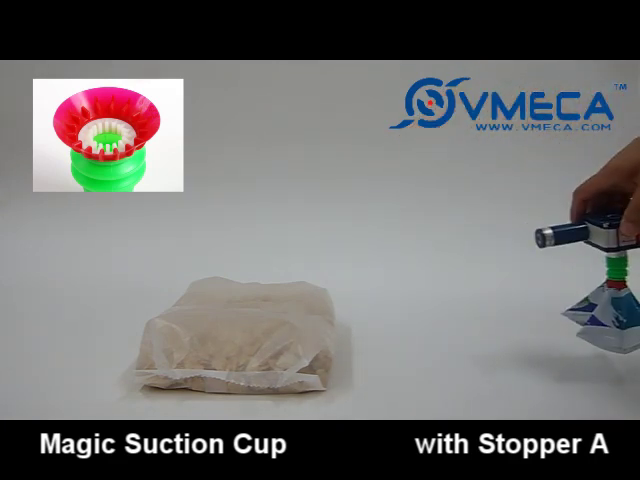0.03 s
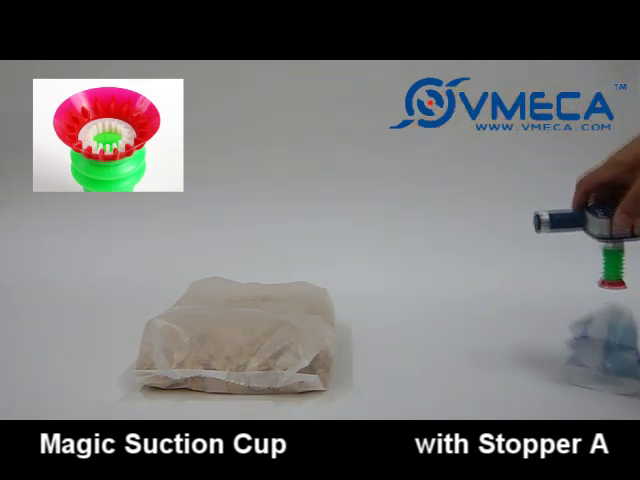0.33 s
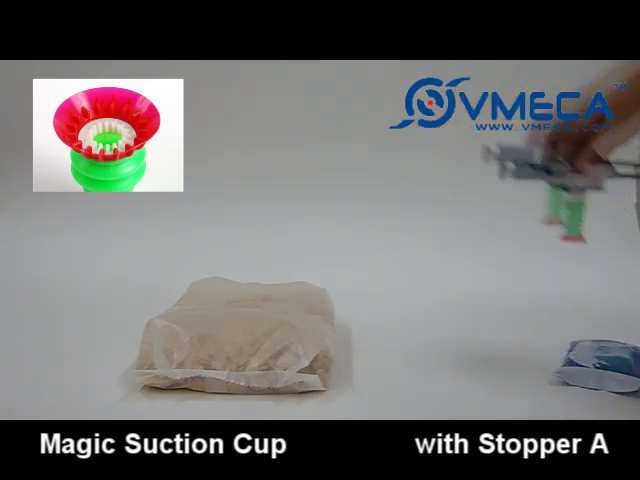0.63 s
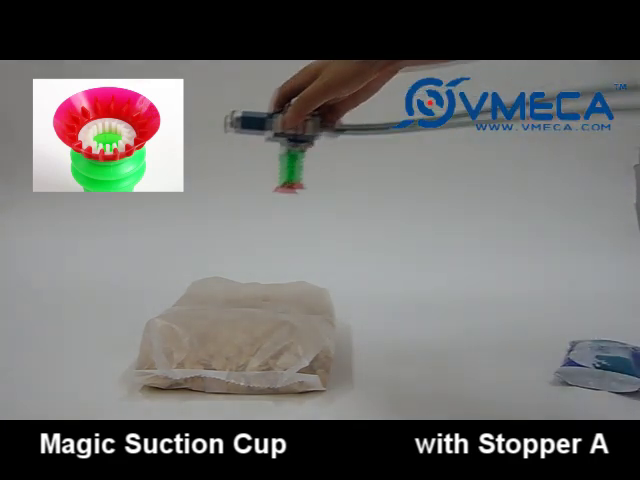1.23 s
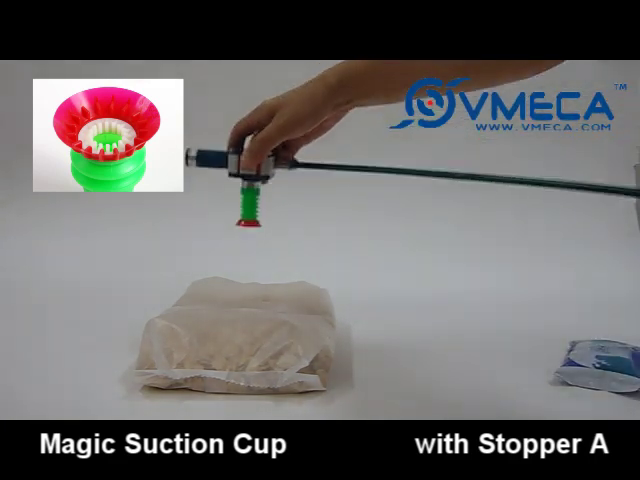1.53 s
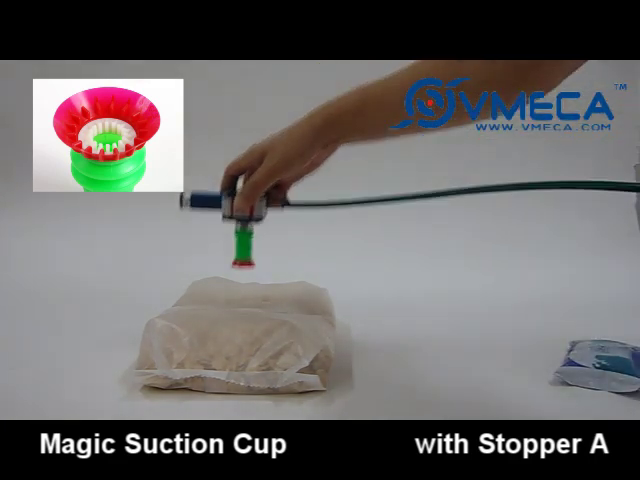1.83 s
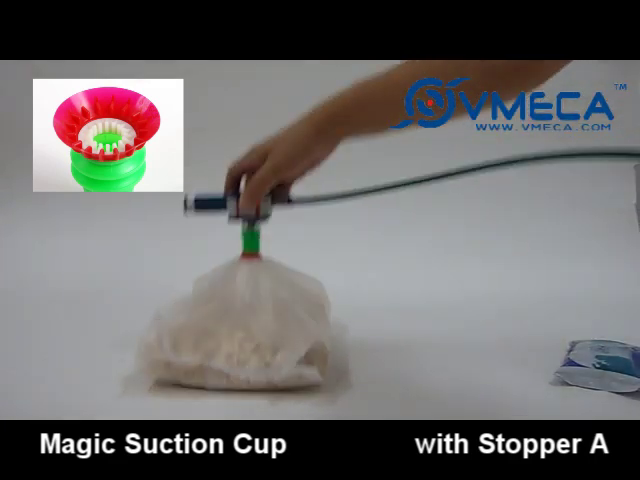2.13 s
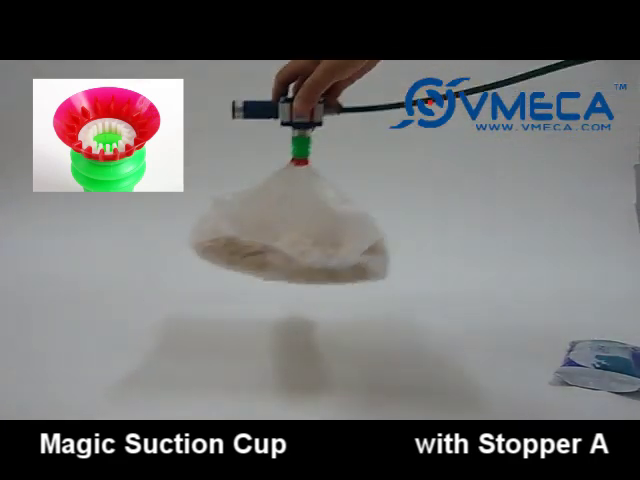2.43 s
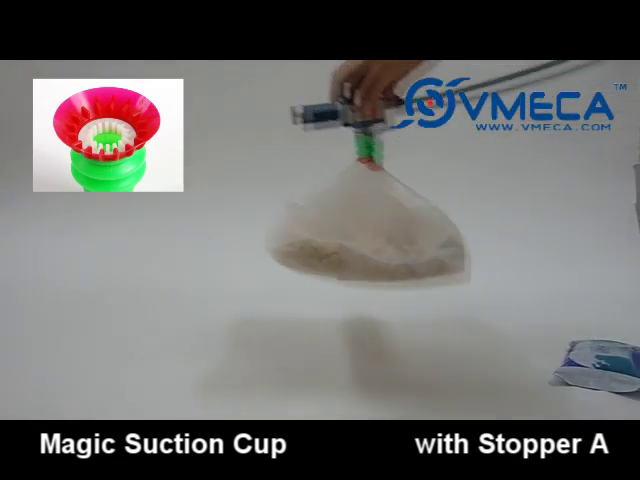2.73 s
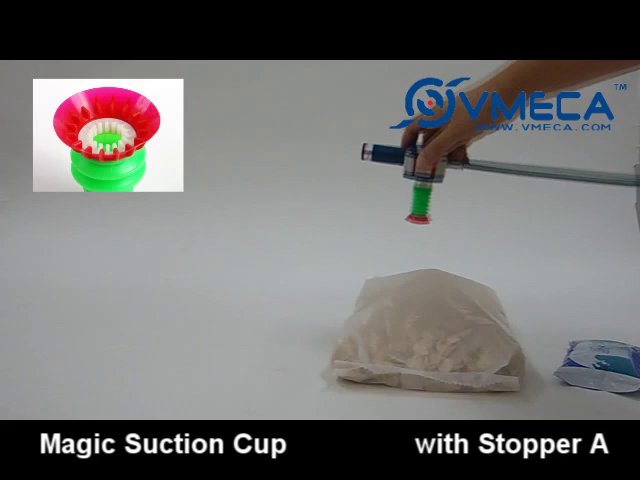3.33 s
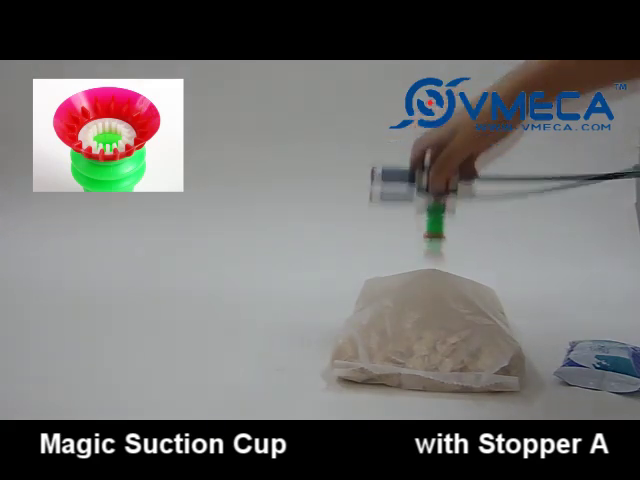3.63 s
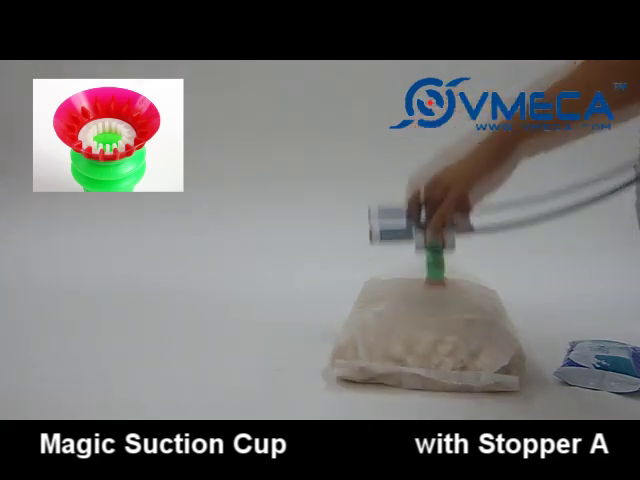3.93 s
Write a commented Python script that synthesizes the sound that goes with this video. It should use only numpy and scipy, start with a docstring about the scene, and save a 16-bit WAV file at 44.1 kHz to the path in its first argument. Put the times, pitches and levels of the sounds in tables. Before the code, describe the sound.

A suction tool's thin air hiss ends at 0.3 seconds in a valve knock and a fading burst. From 1 second air rushes loudly. At 2 a plastic bag crinkles with a soft thump, and the hiss turns thin. Around 3.3 the valve knocks, air sputters and the bag lands with a low boom on a table. Rushing and crinkling return at 3.7, over faint room rumble.

```python
"""Indoors at a table, a hand-held suction cup on a compressed-air ejector drops a plastic bag
and picks up another. Sealed on a bag it hisses thinly; to let go, a valve knocks and dumps the air;
with the cup open it rushes loudly. The second bag crinkles as it is gripped and lifted, sputters
free, booms on the table and is gripped again. The room rumbles underneath."""
import sys
import numpy as np
from scipy import signal
from scipy.fft import rfft, irfft
from scipy.io import wavfile
from scipy.ndimage import uniform_filter1d

SR = 44100
rng = np.random.default_rng(int(sys.argv[2]) if len(sys.argv) > 2 else 0)


def digitize_waveform(pressure):
    """Quantize a signal to 16-bit integers and store it at the path in sys.argv[1].

    Rows of a 2-D input are taken as channels; values are limited to [-1, 1].
    """
    field = np.atleast_2d(pressure).T
    bounded = np.clip(field, -1, 1)
    quanta = np.round(bounded * 32767).astype(np.int16)
    wavfile.write(sys.argv[1], SR, quanta)


N = 176400
T = np.arange(N) / SR
HZ, FULL_HZ = np.fft.rfftfreq(512, 1 / SR), np.fft.rfftfreq(N, 1 / SR)
FRAME_S = np.arange(N // 128 + 5) * 128 / SR
BASS_LIKENESS, VENT_WIDE_HZ = .96, 61400  # stereo image, see likeness()
THUD_ATTACK_S = .006

def amp(db):
    """Decibels to gain."""
    return 10 ** (np.asarray(db) / 20)

def unit(x):
    """Scales to rms 1."""
    return x / np.sqrt(np.mean(x ** 2) + 1e-20)

def read(points, hz):
    """Reads a curve on a log-frequency axis."""
    f, value = np.transpose(points)
    return np.interp(np.log(hz + 1), np.log(f + 1), value)

def fader(points):
    """Gain over time from a level curve."""
    return amp(np.interp(T, *np.transpose(points)))

def colour(x, eq):
    """Filters a sound by an EQ curve."""
    return irfft(rfft(x) * amp(read(eq, FULL_HZ)), N)

def bell(hz, width):
    """EQ bell of height 1, its width taken at half height."""
    return np.exp(-np.log(16) * ((HZ - hz) / width) ** 2)

def likeness(hz, wide_hz):
    """Left-right correlation, halved at wide_hz: scattered treble differs between the ears."""
    return BASS_LIKENESS / (1 + (hz / wide_hz) ** 2.03)

def pair(z, same):
    """Mixes two unrelated signals, as mid and side, into left and right."""
    mid, side = np.sqrt((1 + same) / 2) * z[0], np.sqrt((1 - same) / 2) * z[1]
    return np.array([mid + side, mid - side])

def noise(eq, same=BASS_LIKENESS):
    """Steady coloured stereo noise at rms 1."""
    return unit(colour(pair(rng.standard_normal((2, N)), same), eq))

def jet(eq, wide_hz, peaks=(), sweep_db=0):
    """Turbulent air through resonant passages, rippled by slowly shifting reflections."""
    a, b, c, d, ripple, flutter = rng.standard_normal((6, len(FRAME_S), len(HZ)))
    shape_db = read(eq, HZ) + sum(db * bell(hz, width) for hz, width, db in peaks)
    ripple_db = 2 * unit(uniform_filter1d(ripple, size=240, axis=0))
    flutter = uniform_filter1d(flutter, size=6, axis=0)
    flutter_db = .5 * unit(uniform_filter1d(flutter, size=60, axis=1))
    turbulence = pair([a + 1j * b, c + 1j * d], likeness(HZ, wide_hz))
    air = turbulence * amp(shape_db + ripple_db + flutter_db)
    frames = np.array([air, air * amp(sweep_db)])
    _, waves = signal.istft(frames, nperseg=512, noverlap=384, time_axis=-2, freq_axis=-1)
    steady, swept = waves[..., :N]
    return swept / np.std(steady)

# Room tone: fader (t/s, level/dB) and EQ (f/Hz, level/dB)
RUMBLE_FADER = [(0, -45.5), (2.2, -48), (2.25, -62), (2.45, -54), (2.56, -47), (4, -48)]
RUMBLE_EQ = [(12, -31), (20, 0), (102, -5.5), (130, -21), (168, -10), (206, -12.5), (242, -7.5),
             (348, -21.5), (377, -14.5), (500, -19), (650, -25), (1100, -120)]
def room_rumble():
    """The room's low bed of noise."""
    return fader(RUMBLE_FADER) * noise(RUMBLE_EQ, same=.74)

# Thin hiss: fader (t/s, level/dB), EQ (f/Hz, level/dB), resonances (f/Hz, width/Hz, boost/dB)
SEALED_FADER = [(0, -37.5), (.3, -36.5), (.34, -75), (2.2, -68), (2.4, -57), (2.58, -38.5), (2.85, -35),
                (3.12, -37), (3.26, -38.5), (3.31, -73)]
SEALED_EQ = [(150, 0), (900, -12), (2000, -6), (2700, -2), (4600, -7), (7000, -6.5), (9800, -9.5),
             (12000, -8.5), (13200, 2.5), (14800, 0)]
SEALED_BELLS = [(6020, 1070, 7), (8400, 400, 3)]
def sealed_hiss():
    """The ejector hisses thinly while a bag seals the cup."""
    return fader(SEALED_FADER) * jet(SEALED_EQ, wide_hz=31400, peaks=SEALED_BELLS)

# Valve cues (t/s, hiss level/dB, knock level/dB, resonance scale, opening/s, hold/s)
VALVE_CUES = [(0.302, -27, -20, 1.13, 0.051, 0.088), (3.265, -30, -34, .4, .003, 0.12)]
# Exhaust: EQ (f/Hz, level/dB), resonances (f/Hz, width/Hz, unscaled boost/dB), fade (f/Hz, dB/s)
VENT_EQ = [(120, -8), (600, 0.5), (1100, -3.5), (2600, -3.5), (6000, -5), (8500, -8.5), (10000, -8.5),
           (13500, -7), (15000, -23.5)]
VENT_BELLS = [(1680, 300, 4), (3400, 600, 0.5), (4060, 270, 0), (4850, 440, 5), (7290, 1140, 7.5),
              (11160, 590, 8.5), (11850, 570, 11), (12800, 350, 6), (14700, 680, 11)]
VENT_FADE = [(300, 45), (1700, 39.5), (3600, 69), (4900, 57), (6000, 70), (7500, 74), (12000, 116),
             (15000, 147)]
# Ring after the knock (f/Hz, level/dB)
KNOCK_RING_EQ = [(60, -21), (150, -8), (250, -11), (380, 2.5), (530, -7), (720, -0.5), (1000, -20),
                 (4000, -50)]
def valve_release(start, hiss_db, knock_db, resonance, opening_s, hold_s):
    """The valve knocks, then dumps air that darkens as the pressure runs out."""
    knock_hz, knock_s, ring_t60 = 470, .00079, .14
    age = np.maximum(T - start, 0)
    fade_db = -np.maximum(FRAME_S - start - hold_s, 0)[:, None] * read(VENT_FADE, HZ)
    peaks = [(hz, width, resonance * db) for hz, width, db in VENT_BELLS]
    flow = np.minimum(.43 + age / opening_s, 1)  # part of the flow escapes at once
    hiss = flow * jet(VENT_EQ, VENT_WIDE_HZ, peaks, fade_db)
    from_centre = T - start - 2 * knock_s
    knock = np.sin(2 * np.pi * knock_hz * from_centre) * np.exp(-.5 * (from_centre / knock_s) ** 2)
    ring = amp(-9 - 60 * age / ring_t60) * noise(KNOCK_RING_EQ)
    return (T > start) * (amp(hiss_db) * hiss + amp(knock_db) * ring) + amp(knock_db) * knock

# Leak: fader (t/s, level/dB) and EQ (f/Hz, level/dB)
LEAK_FADER = [(.55, -74), (.72, -47), (.85, -43), (1.02, -41), (1.1, -60)]
LEAK_EQ = [(200, 10), (800, -3), (1300, 4), (2100, -9), (3500, -7), (5500, -2), (7500, 4), (10800, 5),
           (15000, -1.5)]
def idle_leak():
    """Air seeps out faintly while the supply idles."""
    return fader(LEAK_FADER) * jet(LEAK_EQ, wide_hz=11100)

# Treble shelf as the exhaust turns away (t/s, level/dB)
EXHAUST_SHELF = [(1.0, 13), (1.08, 3.5), (1.35, -1.5), (1.6, -4.2), (1.95, -5.5), (3.6, 8.5), (4, -7.5)]
# Echo off the table, sooner as the tool is lowered (t/s, delay/s)
TABLE_DELAY = [(1.0, 0.0017), (1.4, 0.0014), (1.75, 0.0015), (2.0, 0.00037), (3.6, .0011), (3.85, .0008)]
# Hollow ring in the open cup (t/s, boost/dB)
CUP_BOOST = [(1.2, 3.5), (1.32, 7.5), (1.58, 5.5), (1.7, 1.5)]
def tool_motion():
    """Moving EQ in dB as the hand carries the tool: its aim, the table's echo, the cup's ring."""
    def follow(points):
        return np.interp(FRAME_S, *np.transpose(points))[:, None]
    treble_hz, comb_db = 6000, -.25
    shelf = follow(EXHAUST_SHELF) * HZ ** 2 / (HZ ** 2 + treble_hz ** 2)
    comb = comb_db * np.cos(2 * np.pi * HZ * follow(TABLE_DELAY)) * np.exp(-HZ / treble_hz)
    return shelf + comb + follow(CUP_BOOST) * bell(hz=1600, width=190)

# Open rush, ahead of the moving EQ: fader (t/s, level/dB), EQ (f/Hz, level/dB),
# resonances (f/Hz, width/Hz, boost/dB)
OPEN_FADER = [(.97, -79), (1.02, -47.5), (1.07, -31), (1.3, -28.5), (1.7, -26.5), (1.97, -27), (2.16, -35),
              (2.24, -40.5), (2.38, -50.5), (3.66, -66), (3.7, -34), (3.8, -33.5), (4, -31.5)]
OPEN_EQ = [(150, -15.5), (480, -10), (780, -1), (1200, -2.5), (1650, -2), (2500, -2.5), (4000, -8.5),
           (6000, -5.5), (8500, -5.5), (10000, -11), (13000, -10), (15000, -49)]
OPEN_BELLS = [(1300, 210, 0.83), (2440, 260, 1), (3080, 450, 1.8), (4800, 670, 3.3), (7040, 790, 1.7)]
def open_rush():
    """Air rushes into the open cup, loud and broad."""
    return fader(OPEN_FADER) * jet(OPEN_EQ, wide_hz=16000, peaks=OPEN_BELLS, sweep_db=tool_motion())

# Air over the film: fader (t/s, level/dB) and EQ (f/Hz, level/dB)
FILM_FADER = [(1.95, -45), (1.99, -25), (2.03, -27.5), (2.06, -29), (2.11, -27.5), (2.2, -34.5),
              (2.26, -37.5), (2.39, -41), (2.57, -35.5), (2.75, -40.5), (2.95, -46), (3.255, -47),
              (3.268, -31), (3.42, -34.5), (3.5, -36.5), (3.58, -33.5), (3.68, -35.5), (3.83, -26),
              (3.92, -29), (4, -28.5)]
FILM_EQ = [(150, -8), (300, -3.5), (600, 0.5), (1200, 2), (2000, 0), (3000, -3.5), (4200, -7.5), (4900, -8),
           (7000, -12.5), (10000, -18), (13000, -17), (15000, -76)]
def film_rush():
    """Air drawn past the bag's film makes a dull rush."""
    return fader(FILM_FADER) * jet(FILM_EQ, wide_hz=8650)

# Plastic film: crumples (peak t/s, level/dB, attack/s, decay/s),
# snaps (t/s, level/dB before halving), EQ for both (f/Hz, level/dB)
CRUMPLE_CUES = [(2.003, -21.5, 0.011, 0.02), (2.149, -23, 0.029, 0.045), (3.755, -29, 0.0032, 0.04),
                (3.82, -27.5, 0.061, 0.08), (3.858, -21, 0.0048, 0.011), (3.912, -30, .002, 0.0091),
                (3.985, -26, 0.039, 0.054)]
SNAP_CUES = [(1.9717, -22), (2.152, -6), (2.841, -22), (3.28, -13), (3.856, -26), (3.912, -23)]
CRINKLE_EQ = [(100, -11), (170, 2), (235, 1), (350, -1.5), (700, 0.5), (1150, 3), (2200, -6.5), (3300, 1),
              (6000, -3), (9000, -2.5), (13000, -2), (15000, -37)]
def bag_crinkle():
    """The film buckles in swarms of tiny clicks, with a few sharp snaps."""
    grains_per_s, spread_db, snap_s = 8000, 3, .001
    power = sum(amp(2 * db) * np.exp(-2 * np.maximum((peak - T) / attack, (T - peak) / decay))
                for peak, db, attack, decay in CRUMPLE_CUES)
    sizes = amp(spread_db * np.minimum(rng.exponential(1, (2, N)), 4))
    grains = sizes * rng.choice([-1, 1], (2, N)) * (rng.random(N) < grains_per_s / SR)
    grains = irfft(pair(rfft(grains), likeness(FULL_HZ, wide_hz=7500)), N)
    snaps = sum(amp(db) * (T > start) * np.exp(-abs(T - start) / snap_s) for start, db in SNAP_CUES)
    return np.sqrt(power) * unit(colour(grains, CRINKLE_EQ)) + .5 * snaps * noise(CRINKLE_EQ)

# Cup meeting the bag: cues (t/s, level/dB) and EQ (f/Hz, level/dB)
PRESS_CUES = [(2.005, -29.5), (3.81, -36)]
PRESS_EQ = [(60, -30), (150, -19), (225, 5.5), (330, -14), (480, -4), (1000, -25), (3000, -50)]
def cup_press(start, db, decay_s=.04):
    """The bag's filling gives under the cup with a soft thump."""
    age = np.maximum(T - start, 0)
    return amp(db) * np.minimum(age / THUD_ATTACK_S, 1) * np.exp(-age / decay_s) * noise(PRESS_EQ)

def low_bumps(times_s=(2.222, 2.413), decay_s=.16):
    """Two faint, very low bumps, like a microphone briefly overloading."""
    first, second = ((T > start) * np.exp(-abs(T - start) / decay_s) for start in times_s)
    return amp(-33.5) * signal.sosfilt(signal.butter(1, 35, fs=SR, output="sos"), second - first)

# Blast as the bag tears free: cue (t/s, level/dB, hold/s, decay/s), EQ (f/Hz, level/dB),
# resonances (f/Hz, width/Hz, boost/dB)
BLOW_OFF_CUES = [(3.3206, -20.5, .025, 0.024)]
BLOW_OFF_EQ = [(100, -10), (230, 0), (700, -1.5), (1200, 0), (2200, -1.5), (6000, -6), (9000, -6),
               (13000, -6), (15000, -7.5)]
BLOW_OFF_BELLS = [(1180, 140, 7), (3040, 440, 7), (4860, 510, 8.5), (11900, 700, 7)]
def blow_off(start, db, hold_s, decay_s):
    """The film flaps in the escaping air and chops it into a rough burst."""
    sputter_db, sputter_hz = 3, 700
    lowpass = signal.butter(2, sputter_hz, fs=SR, output="sos")
    flap = unit(signal.sosfilt(lowpass, rng.standard_normal(N)))
    envelope = (T > start) * np.exp(-np.maximum(T - start - hold_s, 0) / decay_s)
    blast = jet(BLOW_OFF_EQ, VENT_WIDE_HZ, BLOW_OFF_BELLS)
    return amp(db) * envelope * unit(amp(sputter_db * flap) * blast)

# The full bag lands and settles (t/s, level/dB); the table's modes (f/Hz, level/dB, t60/s)
LANDING_CUES = [(3.325, -33), (3.568, -48.5)]
BOOM_MODES = [(107.4, 1, 0.72), (171, 5.5, 0.29), (215, -16, 0.14)]
def bag_landing(start, db):
    """The table booms under the dropped bag."""
    age = np.maximum(T - start, 0)
    ring = sum(amp(mode_db - 60 * age / t60) * np.sin(2 * np.pi * hz * age)
               for hz, mode_db, t60 in BOOM_MODES)
    return amp(db) * np.minimum(age / THUD_ATTACK_S, 1) * ring

def reflections(x, wet_db=-10, t60=.32, echoes_per_s=2000):
    """Table and walls add a short spray of echoes."""
    t = T[:SR // 4]
    taps = rng.standard_normal(len(t)) * (rng.random(len(t)) < echoes_per_s / SR)
    taps *= (t > .003) * amp(-60 * t / t60)  # pre-delay, then decay
    return x + amp(wet_db) * signal.fftconvolve(x, taps[None] / np.linalg.norm(taps), axes=1)[:, :N]

def scene():
    """The mix: air and crinkle with echoes, thuds and room tone dry."""
    air = sealed_hiss() + open_rush() + idle_leak() + film_rush()
    air += sum(valve_release(*cue) for cue in VALVE_CUES)
    air += sum(blow_off(*cue) for cue in BLOW_OFF_CUES)
    thuds = sum(cup_press(*cue) for cue in PRESS_CUES) + low_bumps()
    thuds += sum(bag_landing(*cue) for cue in LANDING_CUES)
    return reflections(air + bag_crinkle()) + thuds + room_rumble()

def record(dry):
    """The master: a slight pan to the right, then a steep high cut."""
    pan_db, cutoff_hz = .65, 15200
    panned = dry * amp([[-pan_db / 2], [pan_db / 2]])
    high_cut = signal.firwin(511, cutoff_hz, window=("kaiser", 9), fs=SR)
    return signal.oaconvolve(panned, high_cut[None], "same")

dry = scene()
out = record(dry)
digitize_waveform(out)
```